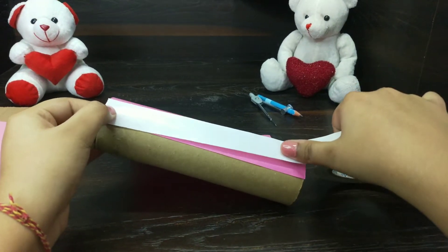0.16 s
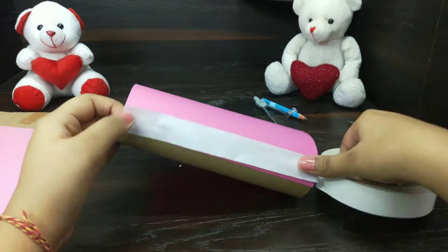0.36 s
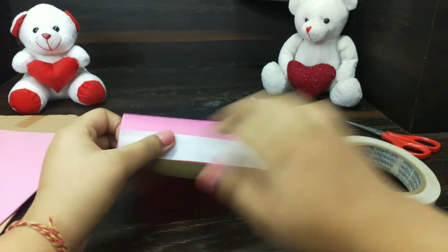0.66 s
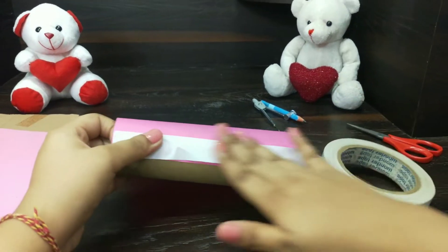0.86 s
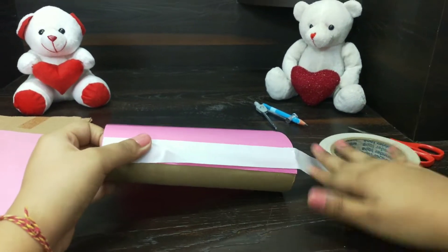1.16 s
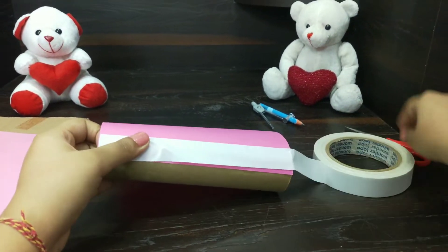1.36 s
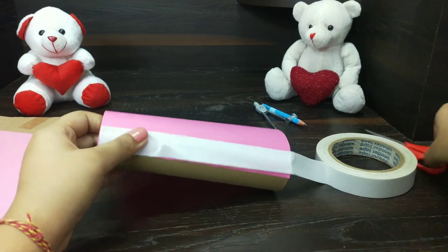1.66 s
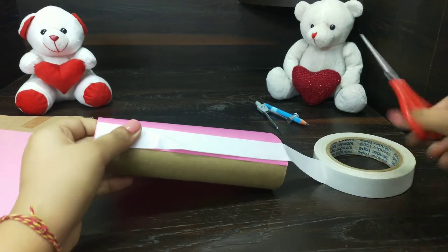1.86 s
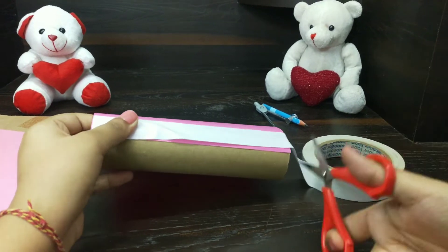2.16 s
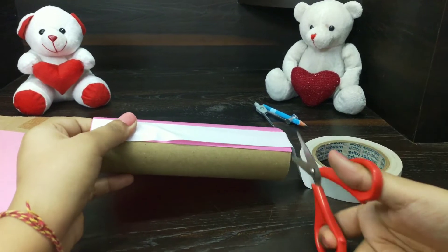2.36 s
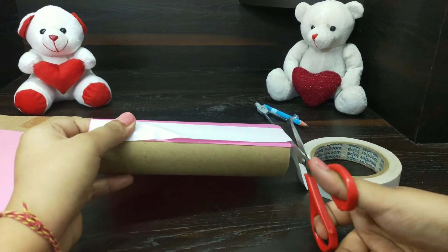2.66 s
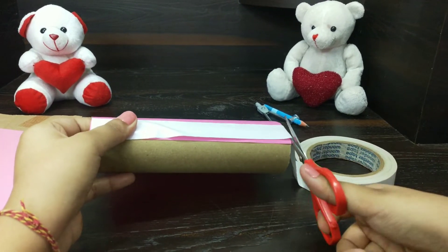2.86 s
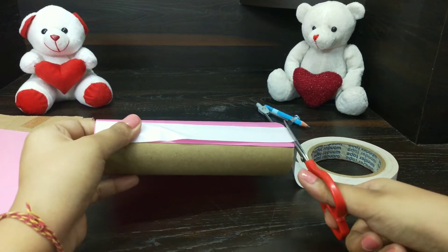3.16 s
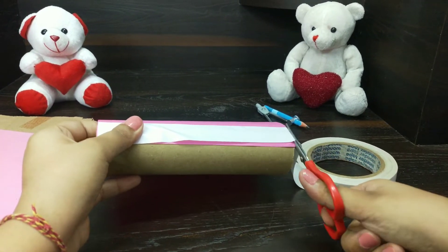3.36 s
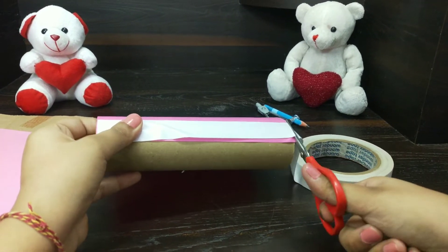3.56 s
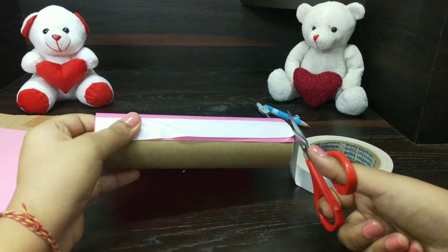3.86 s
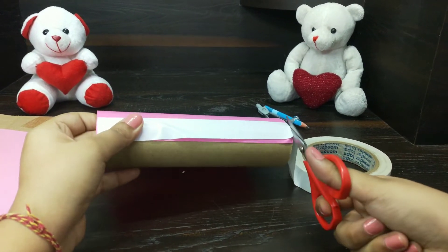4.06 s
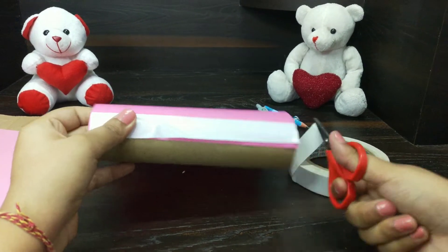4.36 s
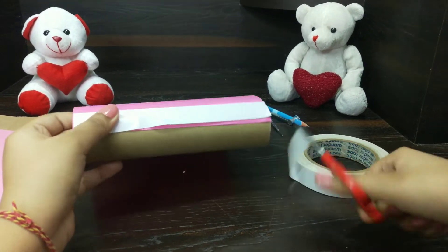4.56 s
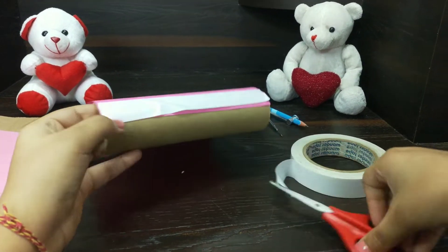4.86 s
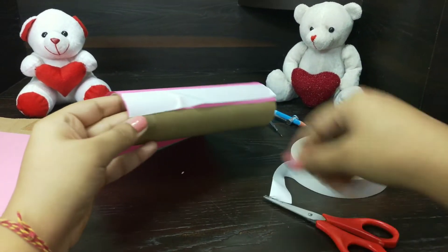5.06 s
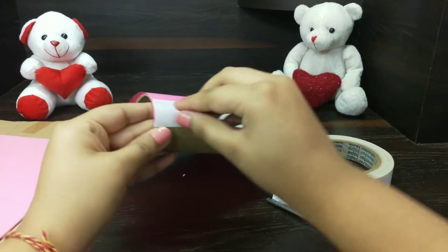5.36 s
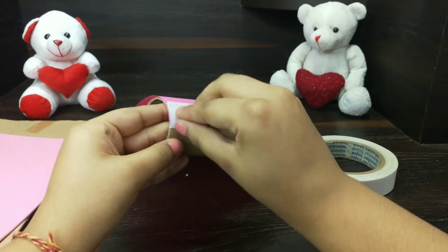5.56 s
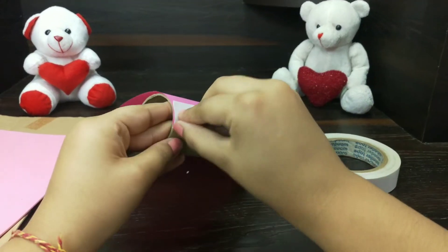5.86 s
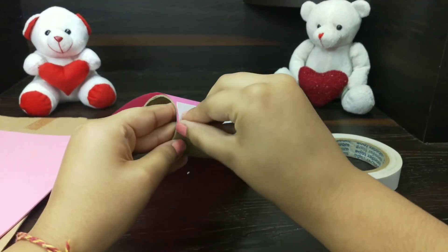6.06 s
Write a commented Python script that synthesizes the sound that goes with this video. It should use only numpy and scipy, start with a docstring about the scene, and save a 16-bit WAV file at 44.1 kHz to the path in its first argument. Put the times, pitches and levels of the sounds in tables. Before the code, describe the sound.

Hands work with a cardboard tube, tape and paper on a wooden table in a small room, miked closely in stereo. Soft hollow knocks and papery rubbing come first, then a sharp metallic click as scissors are picked up. Faint handling and tiny snips follow, nearly quiet. Heavy tube knocks lead to the scissors dropping with a hard bright clatter, then light taps and rustles over a faint hum.

```python
"""Hands press tape onto a cardboard tube on a wooden table, close to two microphone ports in a small room.
Tube and tape roll knock on the table and fingers slide over paper; scissors are picked up, turned in the hand,
snip and, after more heavy knocks, are dropped; light knocks and scrapes follow. A low hum and a thin hiss swell
and fade throughout. Knocks excite resonances, friction is shaped noise, and decaying noise tails are the room."""
import sys
import numpy as np
from scipy import signal
from scipy.fft import rfft, irfft, next_fast_len
from scipy.io import wavfile
from scipy.ndimage import uniform_filter1d, map_coordinates

SR = 44100
rng = np.random.default_rng(int(sys.argv[2]) if len(sys.argv) > 2 else 0)


def to_wav(sig):
    """Store sig (one row per channel, or 1-D mono) as 16-bit WAV at the path in sys.argv[1].

    Samples outside -1..1 are clipped; the rate is SR.
    """
    pcm = np.clip(np.atleast_2d(sig), -1, 1) * 32767
    pcm = np.round(pcm).astype(np.int16)
    wavfile.write(sys.argv[1], SR, pcm.T)  # frames by channels


N = 273993
TIME = np.arange(N) / SR

# spectrum of the hiss around the microphone port resonance: frequency_hz, density_db (per Hz)
HISS_SPECTRUM = [(2500, -46.5), (3600, -12), (4470, -4), (4900, 1.5), (5370, 3), (6310, -7), (6880, -9.5),
                 (7550, -16), (8500, -29.5), (9500, -57.5)]
# spectrum of the treble sheen: frequency_hz, density_db (per Hz)
SHEEN_SPECTRUM = [(4590, -37), (7800, -3), (8390, -6), (10900, -6), (11300, -9), (11800, -5.5), (12700, -3),
                  (13800, -1), (15500, 1), (16200, -20)]


def amp(db):
    """Logarithmic level: decibels to amplitude gain."""
    return 10 ** (np.asarray(db) / 20)


def unit(x):
    """Power normalisation: scaled to rms 1."""
    return x / np.sqrt(np.mean(x ** 2) + 1e-20)


def along(points, hz):
    """Logarithmic frequency scale: (Hz, value) points joined by straight lines on it."""
    f, v = np.transpose(points)
    return np.interp(np.log(hz + 1), np.log(f + 1), v)


def curves(rows):
    """Time-varying control: one value per sample for each column after the time."""
    s, *cols = np.transpose(rows)
    return [np.interp(TIME, s, c) for c in cols]


def wobble(rate):
    """Band-limited fluctuation: a smooth curve through random knots, rate of them a second."""
    knots = rng.standard_normal(int(N * rate / SR) + 4)
    return map_coordinates(knots, [TIME * rate])


def filtered(x, response):
    """Linear filtering: the spectrum of x times a (complex) response of frequency."""
    m = next_fast_len(N + SR // 2)
    return irfft(rfft(x, m) * response(np.fft.rfftfreq(m, 1 / SR)), m)[..., :N]


def pair(z, hz):
    """Interchannel coherence: two unrelated spectra mixed into left and right, alike mostly in the bass."""
    # left-right correlation: frequency_hz, likeness (0 to 1)
    likeness = [(60, 0.89), (130, 0.97), (290, 0.78), (640, 0.62), (1410, 0.037), (3100, 0.11),
                (6820, 0.047), (15000, 0.03)]
    turn = np.arccos(np.clip(along(likeness, hz), 0, 1))[:, None] / 2
    common, opposed = np.cos(turn) * z[0], np.sin(turn) * z[1]
    return np.array([common + opposed, common - opposed])


def noise(spectrum, grit_db, grit_rate, patchy_db=0, shape=None):
    """Modulated random noise: stereo, rms 1, broken into grains in time and patches in pitch."""
    white = rng.standard_normal((2, N)) * amp(grit_db * wobble(grit_rate))
    coloured = filtered(white, lambda f: amp(along(spectrum, f)))
    hz, t, z = signal.stft(coloured, SR, nperseg=1024)
    field = uniform_filter1d(rng.standard_normal(z.shape[1:]), size=5, axis=0)
    field = uniform_filter1d(field, size=4, axis=1)
    gain = amp(patchy_db * unit(field) + (shape(hz[:, None], t) if shape else 0))
    # patches move energy between pitches without changing a frame's expected level
    weight = amp(along(spectrum, hz))[:, None]
    gain /= np.sqrt(np.mean((gain * weight) ** 2, axis=0))
    return unit(signal.istft(pair(z, hz) * gain, SR, nperseg=1024)[1][:, :N])


def force(times, db, rise, decay):
    """Exponential decay: summed envelopes of contacts that rise, then die away."""
    out = np.zeros(N + SR)
    t = TIME[:SR // 3]
    ups = np.abs(rise) + 1e-4
    t60s = np.abs(decay) + 0.0026  # even a zero decay takes 2.6 ms
    for s, level_db, up, t60 in zip(times, db, ups, t60s):
        shape = (1 - np.exp(-t / up)) ** 2 * amp(-60 * t / t60)
        out[round(s * SR):][:len(t)] += amp(level_db) * shape / shape.max()
    return out[:N]


def ring(times, db, decay, modes, rattle_db, soft_hz):
    """Modal resonance: one push per contact and a rattle of weak ones after it drive a body's modes."""
    def body(f):
        soft = 1 / (1 + 1j * f / soft_hz) ** 2  # a soft contact pushes less at high frequencies
        total = 0
        for k, (centre, width, level_db) in enumerate(modes):
            mode = 1j * f * width / (centre * centre - f * f + 1j * f * width)
            total = total + (-1) ** k * amp(level_db) * mode
        return soft * total

    pushes = np.bincount(np.round(times * SR).astype(int), amp(db), N)
    flat = noise([(20, 0), (20000, 0)], grit_db=5.5, grit_rate=200)
    rattle = force(times, db + rattle_db, 0 * times + 0.0018, decay) * flat
    peak = np.abs(filtered(TIME == 0, body)).max()
    return filtered(pushes + rattle, body) / peak


def knocks():
    """Struck resonators: table, tube air and tube wall ring on after a knock; the card surface only ticks."""
    # dull knocks of tube, roll and hands, before the layer trims: start_s, air_db (tube air),
    # wall_db (tube wall re air), table_db (re air), card_db (re air)
    contacts = [(0.291, -62.5, -5, 19.5, 13), (0.297, -33, -0.5, -33, -12), (0.37, -33, -3.5, -10, -9),
                (0.38, -31.5, -16, -25, -16), (0.458, -51.5, 5, 9, 0), (0.487, -52.5, 6.5, -8, 3),
                (0.582, -43.5, -6.5, -8.5, -13), (1.009, -34.5, -0.5, -14, -7.5),
                (1.034, -39, 1.5, -6.5, -9.5), (1.062, -32.5, 3, -12, -3), (1.075, -33, 0.5, -9.5, -7),
                (1.094, -34.5, 1, 1, 11.5), (1.104, -29.5, 9, -2, 8.5), (1.11, -26.5, -4.5, -10.5, -3),
                (1.126, -32.5, -10.5, -12, -9.5), (1.136, -34.5, -11.5, -8, -15.5),
                (1.394, -33.5, -1, -7.5, 11.5), (1.41, -32.5, -26.5, -10.5, -18.5),
                (1.493, -39.5, 2, -12.5, 8.5), (1.696, -44.5, -3.5, -6.5, 0), (1.724, -44.5, -7, -7, 1),
                (1.783, -49, -17, -1, -15), (2.031, -52.5, -4, -3.5, -6.5), (2.373, -67.5, 13, -2.5, -21.5),
                (2.868, -54, 4.5, 2.5, -3), (2.885, -59.5, 7.5, 3, 12.5), (2.906, -58, 2.5, 1, 3),
                (3.358, -69, 23, -6, 13), (3.666, -50.5, -10, 0.5, -27.5), (3.689, -60, 4, 11, 0.5),
                (3.832, -46.5, -18, 5.5, -40), (3.85, -57, 2, -15, -39), (3.903, -62, -9, 13.5, -19),
                (4.099, -61, 11.5, 5, 2), (4.238, -25, -1.5, -2, 6), (4.245, -22, -19, -24, -13),
                (4.259, -34, 5.5, -10.5, -28), (4.284, -25, -11, -12, -12.5), (4.346, -33, 2, 0.5, 8.5),
                (4.355, -38.5, 4.5, -2, -11), (4.7, -59.5, 2.5, 7, 18), (4.805, -43, 6, -10, 14),
                (4.874, -34.5, -4, -6.5, -4), (4.915, -31.5, -9, -8, 10), (4.934, -31, -4, -5, -7),
                (4.944, -43.5, -8, -4, -5), (5.364, -56, -17, 12.5, -18), (5.39, -60, 6.5, 10, -10),
                (5.515, -43, 1.5, -29, 7), (5.526, -40.5, -3, -11, -7), (5.538, -39.5, -13, -30, -1),
                (5.602, -45, -5, -27, 0.5), (5.619, -43.5, -13, -28, -22), (5.648, -48, 8.5, 0, 10),
                (5.679, -53.5, 14, -5, -9), (5.778, -50, -2, 11, -7), (5.8, -65, -15, 8, -13)]
    # table top modes, before contact softness: frequency_hz, width_hz, level_db
    table_modes = [(106, 13, 0), (151, 13, -2), (182, 34, -8)]
    # tube wall modes, before contact softness: frequency_hz, width_hz, level_db
    wall_modes = [(498, 9.1, 1.5), (616.7, 47.6, 3), (766.5, 64, -3.5)]
    # spectrum of the card surface: frequency_hz, density_db (per Hz)
    card_spectrum = [(410, -23), (700, -12.5), (957, -6), (1020, -11), (1160, -5.5), (1770, -9.5),
                     (1960, -11), (2910, -24.5), (3600, -43), (5000, -38), (6500, -69.5), (11000, -120)]
    usual_db, deadens_per_db = -39, 0.019
    rattle_decay_s, air_decay_s, card_decay_s = 0.074, .095, 0.077  # at the usual strength
    air_hz, air_shift = 344.7, 0.04104  # air column of the tube, share of shift

    s, db, wall_db, table_db, card_db = np.transpose(contacts)
    lasts = np.exp(-deadens_per_db * (db - usual_db))  # harder knocks are held in the hand and die sooner
    rattle_s = rattle_decay_s * lasts
    table = ring(s, db + table_db - 2.0, rattle_s, table_modes, rattle_db=-26.5, soft_hz=897)
    wall = ring(s, db + wall_db - 2.0, rattle_s, wall_modes, rattle_db=-22.5, soft_hz=1500)
    # the grip on the tube ends shifts the air note a little
    note_hz = air_hz * (1 + air_shift * wobble(50))
    air_tone = np.sin(2 * np.pi * np.cumsum(note_hz) / SR)
    air = force(s, db - 3.0, 0 * s + 0.00098, air_decay_s * lasts) * air_tone
    card_noise = noise(card_spectrum, grit_db=3, grit_rate=400, patchy_db=4.0)
    card = force(s, db + card_db - 9.0, 0 * s + 0.0043, card_decay_s * lasts) * card_noise
    return table + air + wall + card


def edges(s, db, clack_db, clack_hz, sheen_db, pan_db, rise, decay):
    """Chattering contact: hard edges give bursts of noise, each contact with its own clack pitch."""
    # spectrum of scissor handles and stiff paper: frequency_hz, density_db (per Hz)
    clack_spectrum = [(530, -43.5), (900, -9.5), (1180, -9), (1310, -10.5), (2030, -5.5), (2670, -8.5),
                      (3180, -7), (4200, -13), (5460, -43.5), (9240, -120)]

    def sides(level_db, decay_s):
        return np.array([force(s, level_db + k * pan_db / 2, rise, decay_s) for k in (1, -1)])

    def hump(hz, t):
        # the pitch changes 8 ms ahead of each contact
        latest = np.clip(np.searchsorted(s, t + .008) - 1, 0, None)
        return 7 * np.exp(-(np.log((hz + 1) / clack_hz[latest]) / 0.1) ** 2)

    clack_noise = noise(clack_spectrum, grit_db=-1.0, grit_rate=500, patchy_db=1.5, shape=hump)
    clack = force(s, db + clack_db - 4.5, rise, 1.2 * decay) * clack_noise
    click_noise = noise(HISS_SPECTRUM, grit_db=-4.0, grit_rate=1100, patchy_db=-3.0)
    click = sides(db - 8, decay) * click_noise
    sheen_noise = noise(SHEEN_SPECTRUM, grit_db=-0.5, grit_rate=2900, patchy_db=8)
    sheen = sides(db + sheen_db - 3, 1.1 * decay) * sheen_noise
    return clack + click + sheen


def clicks():
    """Impulsive contact: a broad crack, then the chatter of the edges."""
    # sharp clicks of scissors, tape and paper, before the layer trims: start_s, click_db,
    # clack_db (re click), clack_hz, sheen_db (re click), pan_db (left minus right), decay_s (before stretch)
    contacts = [(0.292, -51.5, -1.5, 1010, -14, -2, 0.24), (0.458, -45, -8, 1010, -14, 3, 0.035),
                (0.603, -51, -6, 1510, -18, 3, 0.14), (0.7017, -45, -4, 1440, -10, 0, .045),
                (1.3875, -26.5, 4.5, 1613, -13.5, 12, 0.038), (1.3964, -25.5, -8.5, 1803, -19, -2.5, .03),
                (1.402, -34, 0, 1766, -9, -6, 0.056), (1.493, -42.5, 3.5, 2033, -21.5, 4.5, 0.11),
                (1.673, -45, 6, 1906, -23, 8, .035), (1.7125, -43.5, -4.5, 1870, -6, 2.5, 0.048),
                (1.8345, -38.5, -3.5, 2140, -11, 8, .018), (1.849, -50.5, -18, 2230, -14.5, -7, 0.033),
                (3.3387, -53.5, -1, 2500, -4.5, 1, 0.14), (3.3604, -29.5, -1, 2510, -27.5, -3.5, .02),
                (3.625, -48.5, -13.5, 3100, -22, 0, 0.05), (4.508, -54.5, 2, 1956, -24, 1, 0.087),
                (4.579, -52, -2, 2480, -30, -1, 0.032), (4.6445, -53, 0, 1464, -18, 1, 0.072),
                (4.807, -19.5, -6, 2740, -10, 6, 0.019), (4.8697, -21, -9.5, 3230, -14.5, 1.5, 0.022),
                (4.877, -30.5, -2.5, 2080, -18, 9.5, 0.05), (4.9161, -24, -1, 1030, -14.5, 5.5, 0.026),
                (4.934, -21.5, -8.5, 2465, -8, -1, 0.052), (5.4959, -39, -10, 2297, -34, -4, .02),
                (5.66, -40, 4, 3430, -16.5, -7, 0.041), (5.667, -42, 7, 3130, -16.5, 4, 0.056)]
    # spectrum of the first instant of a click: frequency_hz, density_db (per Hz)
    crack_spectrum = [(600, -43.5), (1500, -7.5), (3000, -3), (6000, 3.5), (9000, -15.5), (15000, -14)]
    crack_db, crack_decay_s, rise_s = -9.5, 0.0047, 0.00081  # crack level is re click

    *cols, decay_s = np.transpose(contacts)
    none = 0 * decay_s
    burst = force(cols[0], cols[1] + crack_db, none, none + crack_decay_s)
    crack = burst * noise(crack_spectrum, grit_db=-3, grit_rate=10)
    return crack + edges(*cols, none + rise_s, decay_s)


def scrapes():
    """Sustained friction: the same edges dragged instead of struck, in the middle."""
    # short scrapes and crumples that swell before they fade, before the layer trims:
    # start_s, hiss_db, clack_db (re hiss), clack_hz, sheen_db (re hiss)
    drags = [(0.495, -52, -10, 1640, -16), (0.7828, -46, -9.5, 2580, -14.5),
             (0.8967, -45.5, -1.5, 1500, -16), (0.99, -45, -6, 2400, -14.5), (1.652, -41.5, 4.5, 1805, -11),
             (2.85, -50, -0.5, 2580, -20), (3.0026, -59.5, 4, 2940, -7.5), (3.1596, -55, 4, 2780, -10.5),
             (3.2525, -55.5, 6, 3080, -9), (3.5785, -54, -12, 1985, -12), (3.9, -63.5, -10, 2620, -20),
             (4.0562, -59, -6.5, 3140, -12), (4.187, -44, -0.5, 1300, -11), (4.3318, -32, -3, 2180, -17),
             (4.347, -42.5, -16, 1450, -18), (4.538, -54.5, -1, 1530, -27), (4.701, -46, 1, 2070, -16),
             (5.163, -54.5, -4.5, 3830, -17), (5.401, -51, -3, 2110, -16.5), (5.559, -62.5, 9.5, 1480, -27),
             (5.633, -43.5, 4, 1770, -9), (5.65, -38.5, 3, 3070, -24), (5.6741, -41, -14, 1904, -26),
             (6.126, -60.5, -9.5, 3030, -28)]
    rise_s, decay_s = 0.01, 0.11
    cols = np.transpose(drags)
    none = 0 * cols[0]
    return amp(-3.5) * edges(*cols, none, none + rise_s, none + decay_s)


def blades():
    """Modal ringing of steel: the scissors ring briefly when struck, louder at the left port."""
    # blows that ring the blades, before the layer trim: start_s, level_db
    blows = [(1.3875, -23.5), (1.835, -44), (3.363, -48), (4.808, -21), (4.868, -23), (4.9157, -31),
             (4.9353, -28.5)]
    # scissor blade modes, before contact softness: frequency_hz, width_hz, level_db
    steel_modes = [(3510, 37, -10.5), (5350, 190, -2), (5810, 80, 4), (6140, 38, -4.5), (10040, 79, -7.5),
                   (12000, 57, -6), (14150, 45, -9)]
    s, db = np.transpose(blows)
    ringing = ring(s, db - 12, 0 * s + 0.019, steel_modes, rattle_db=-11, soft_hz=15000)
    return ringing * amp([[2.5], [-2.5]])


def sliding():
    """Friction noise: one uneven grip shakes all bands; duller contact has more and lower scuff, less sheen."""
    # skin and blades sliding on paper: start_s, hiss_db, dullness_db (scuff re hiss)
    strokes = [(0.0, -101, 4), (0.32, -100, 11), (0.36, -65.5, 2), (0.68, -70.5, 1), (0.76, -58, -3.5),
               (1.03, -52.5, -3), (1.19, -70, 2), (1.45, -70.5, 3.5), (1.6, -58.5, 6.5), (1.76, -67.5, -1),
               (1.97, -70, 0.5), (2.3, -86.5, -2.5), (2.84, -95, 1.5), (2.88, -69.5, 0),
               (3.12, -76.5, -0.5), (3.25, -59.5, -4), (3.34, -75, -3.5), (3.63, -68, 1), (3.79, -78, -1.5),
               (4.08, -86, 1), (4.22, -68, 4), (4.37, -55, 4.5), (4.51, -77, -0.5), (4.7, -63.5, 1),
               (4.84, -65, 3.5), (5.03, -61.5, -3), (5.15, -68, 4), (5.22, -76, -17), (5.36, -72.5, 1.5),
               (5.52, -62, -0.5), (5.62, -69, 2.5), (5.69, -56.5, -16), (5.76, -57.5, -4.5), (5.91, -71, 1),
               (6.21, -82.5, -2)]
    # spectrum of the scuff: frequency_hz, density_db (per Hz)
    scuff_spectrum = [(470, -36.5), (800, -0.5), (1010, -15.5), (1080, -3.5), (1340, -6.5), (1530, -3),
                      (1850, -13), (2640, -0.5), (4200, -12.5), (5460, -40.5), (9240, -120)]
    scuff_hz, sinks_per_db = 2350, 0.016  # centre at no dullness; share it sinks for each dB of dullness
    sheen_re_hiss_db, sheen_dulls = -9, 0.37  # dB lost for each dB of dullness
    # under the faint level the sheen falls several times faster than the hiss, to a floor
    faint_db, sheen_dies, sheen_floor_db = -73.5, 2.2, -102

    hiss_db, dull_db = curves(strokes)
    centre_hz = scuff_hz * np.exp(-sinks_per_db * dull_db)
    sheen_db = hiss_db + sheen_re_hiss_db - sheen_dulls * dull_db
    sheen_db = sheen_db - sheen_dies * np.clip(faint_db - hiss_db, 0, None)
    grip = amp(1.2 * wobble(25) + .8 * wobble(150))

    def hump(hz, t):
        return 6 * np.exp(-(np.log((hz + 1) / np.interp(t, TIME, centre_hz)) / 1.1) ** 2)

    scuff_noise = noise(scuff_spectrum, grit_db=0.2, grit_rate=150, patchy_db=4.5, shape=hump)
    scuff = amp(hiss_db + dull_db) * scuff_noise
    hiss = amp(hiss_db) * noise(HISS_SPECTRUM, grit_db=1.4, grit_rate=670, patchy_db=4.0)
    sheen_noise = noise(SHEEN_SPECTRUM, grit_db=-0.5, grit_rate=920, patchy_db=7.0)
    sheen = amp(np.maximum(sheen_db, sheen_floor_db)) * sheen_noise
    return grip * (scuff + hiss + sheen)


def turning():
    """Band-limited friction: two narrow bands while the scissors are opened in the air."""
    # barely heard rubs of the scissors turned in the hand: start_s, rustle_db, whisper_db
    turns = [(2.147, -72, -71), (2.37, -75.5, -70), (2.435, -82, -71), (2.529, -66, -73), (2.62, -77, -80),
             (2.68, -83.5, -82.5)]
    # spectrum of the lower band: frequency_hz, density_db (per Hz)
    rustle_spectrum = [(1000, -52), (1700, -20), (1810, -27), (1910, -3.5), (2130, -13), (2630, 2),
                       (3800, -10), (4940, -48), (8360, -120)]
    # spectrum of the upper band: frequency_hz, density_db (per Hz)
    whisper_spectrum = [(2590, -49.5), (4400, -12), (4740, 1), (5020, 5.5), (5850, -2.5), (6400, -22),
                        (8320, -52), (14100, -120)]
    rise_s, decay_s = 0.0067, 0.27
    s, rustle_db, whisper_db = np.transpose(turns)

    def rubs(level_db):
        return force(s, level_db, 0 * s + rise_s, 0 * s + decay_s)

    rustle = rubs(rustle_db) * noise(rustle_spectrum, grit_db=0.5, grit_rate=180, patchy_db=0.5)
    whisper = rubs(whisper_db) * noise(whisper_spectrum, grit_db=0.0, grit_rate=300, patchy_db=-1.5)
    return rustle + whisper


def background():
    """Amplitude-modulated noise: rumble and drone swell and fade unevenly; a narrow hum wavers."""
    # low background, before lumps and trim: start_s, rumble_db, waver_db (narrow hum)
    levels = [(0.0, -77.5, -92), (0.21, -80, -83.5), (0.35, -71, -71), (0.45, -59.5, -63),
              (1.05, -54.5, -61.5), (1.18, -62, -66.5), (1.42, -57.5, -67), (1.61, -58.5, -58),
              (1.7, -50.5, -62), (2.02, -61, -71), (2.84, -83, -81.5), (3.0, -59.5, -79),
              (3.25, -81.5, -64.5), (3.37, -61, -72), (3.87, -65.5, -76), (4.15, -63, -58),
              (4.34, -51.5, -57), (4.64, -62, -65.5), (4.93, -49.5, -68.5), (5.15, -60, -66.5),
              (5.38, -68.5, -65), (5.5, -58, -72), (5.74, -57.5, -79), (6.21, -68.5, -66)]
    # spectrum of the rumble: frequency_hz, density_db (per Hz)
    rumble_spectrum = [(15, -43), (25, -21.5), (43, -18.5), (97, 3.5), (135, -8.5), (199, 1.5), (222, -7),
                       (253, -9), (280, -25.5), (360, -47), (620, -120)]
    # spectrum of the drone: frequency_hz, density_db (per Hz)
    drone_spectrum = [(150, -35), (250, -2), (301, -6), (340, 2), (375, -7.5), (419, 3), (470, -7.5),
                      (625, -5.5), (775, -7.5), (917, -29), (1000, -26.5), (1300, -54), (2200, -120)]
    # spectrum of the narrow wavering hum: frequency_hz, density_db (per Hz)
    waver_spectrum = [(540, -58.5), (590, -10.5), (620, -5), (650, -12), (700, -57)]
    # drone level when the rumble is at its usual level; the drone swings wider
    usual_drone_db, drone_grows, usual_rumble_db = -63, 1.23, -60

    rumble_db, waver_db = curves(levels)
    lumps = wobble(14)
    rumble = amp(rumble_db + 0.94 * lumps) * noise(rumble_spectrum, grit_db=1.0, grit_rate=83)
    drone_db = usual_drone_db + drone_grows * (rumble_db - usual_rumble_db)
    drone_noise = noise(drone_spectrum, grit_db=0.5, grit_rate=450, patchy_db=4.0)
    drone = amp(drone_db + 0.89 * lumps) * drone_noise
    waver = amp(waver_db - 4.5) * noise(waver_spectrum, grit_db=-3, grit_rate=10)
    return rumble + drone + waver


def room(x):
    """Reverberation: each frequency dies at its own speed; each third of a second gets a fresh random tail."""
    # reverberation time of the walls: frequency_hz, t60_s
    walls = [(100, 0.3), (700, 0.48), (2000, 0.37), (12000, 0.19)]
    out, step, delay = np.zeros((2, N + 2 * SR)), SR // 3, 200  # step and delay in samples
    for start in range(0, N, step):
        hz, t, z = signal.stft(rng.standard_normal((2, SR // 2)), SR, nperseg=256)
        decay = amp(-60 * t / along(walls, hz)[:, None])
        tail = signal.istft(pair(z, hz) * decay, SR, nperseg=256)[1]
        tail = tail / np.linalg.norm(tail[0])
        echo = signal.fftconvolve(x[:, start:start + step], tail, axes=1)
        begin = start + delay
        out[:, begin:begin + echo.shape[1]] += echo
    return out[:, :N]


def scene():
    """Superposition: contacts with their echo over sliding, turning and background."""
    low = knocks()
    high = clicks() + scrapes() + blades()
    echo = room(amp(-10.5) * low + amp(-6) * high)
    return low + high + echo + sliding() + turning() + background()


def record(dry):
    """Transducer response: the microphone colours the sound, its two ports differ, and the band is limited."""
    # nearly flat, with a notch below the port resonance: frequency_hz, gain_db
    mic_response = [(30, 0), (85, -0.5), (3700, -1), (4150, -5.5), (4600, 0)]
    # difference of the ports: frequency_hz, left_minus_right_db
    port_difference = [(60, 1), (110, 1.0), (200, 1.5), (380, -1.5), (700, 0.5), (1290, 0.0), (2380, 1.5),
                       (4400, 0.5), (8120, 7.5), (15000, -2.5)]
    top_hz = 16000

    def response(hz):
        gain_db = along(mic_response, hz) + along(port_difference, hz) * [[.5], [-.5]]
        return amp(gain_db) * (hz < top_hz)

    return filtered(dry, response)


dry = scene()
out = record(dry)
to_wav(out)
```